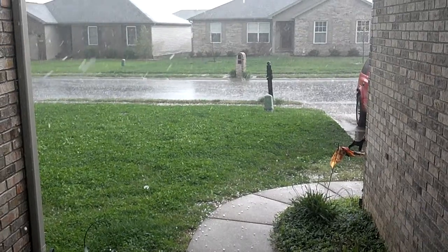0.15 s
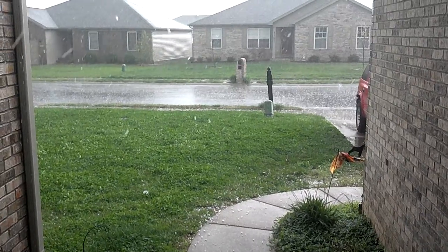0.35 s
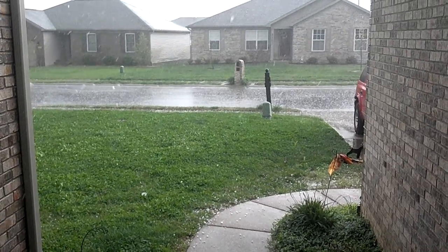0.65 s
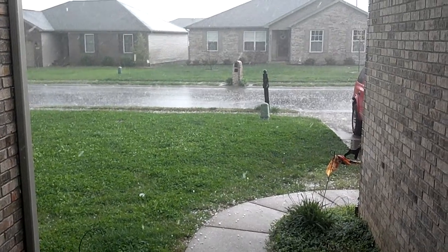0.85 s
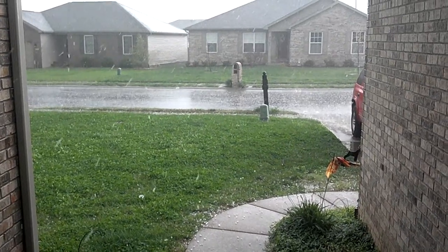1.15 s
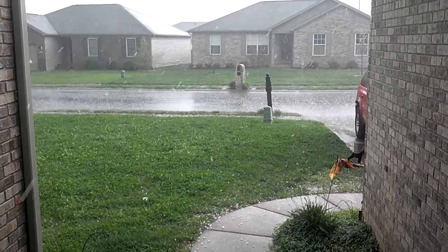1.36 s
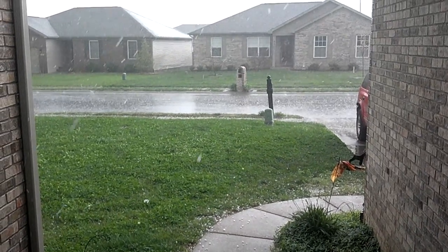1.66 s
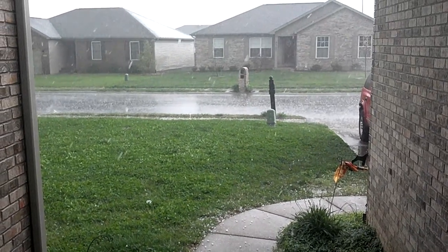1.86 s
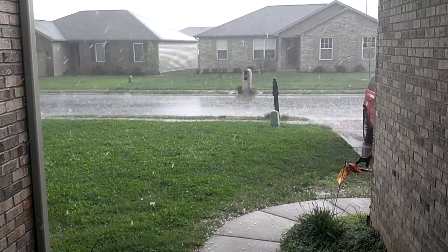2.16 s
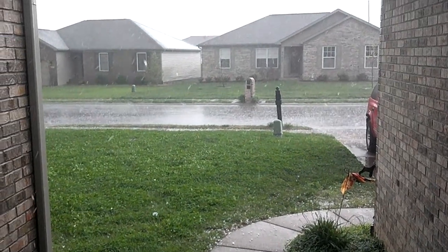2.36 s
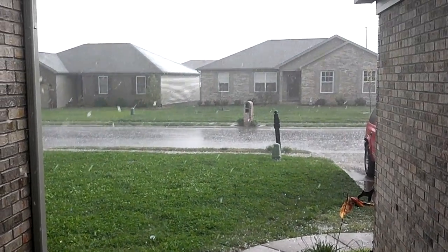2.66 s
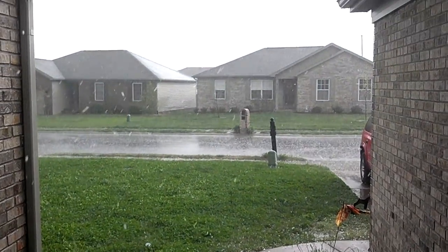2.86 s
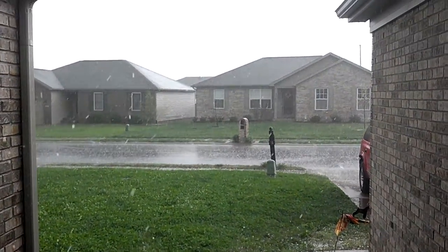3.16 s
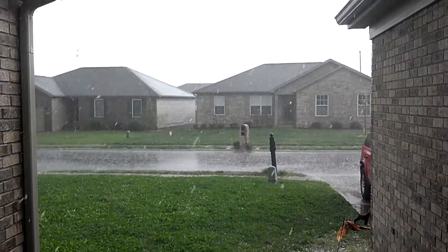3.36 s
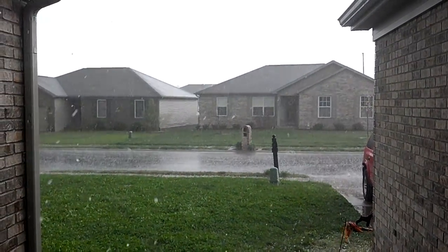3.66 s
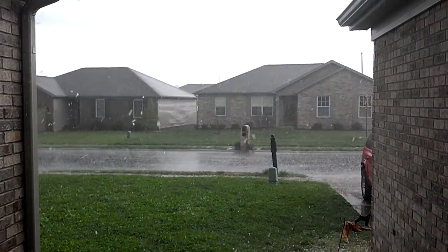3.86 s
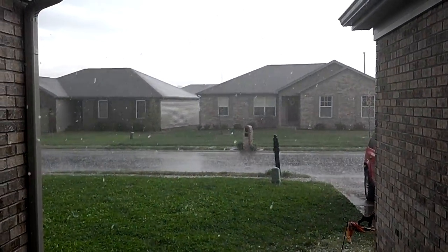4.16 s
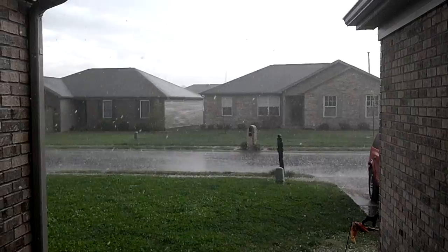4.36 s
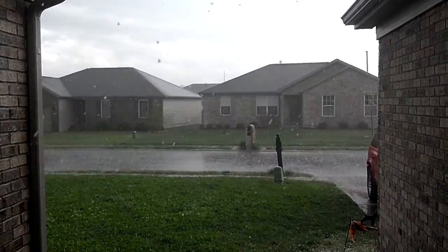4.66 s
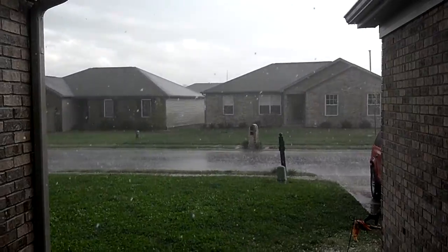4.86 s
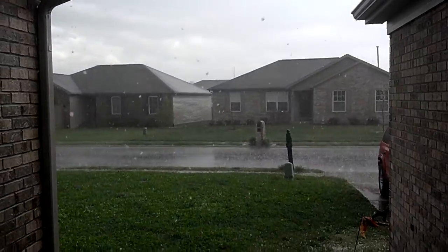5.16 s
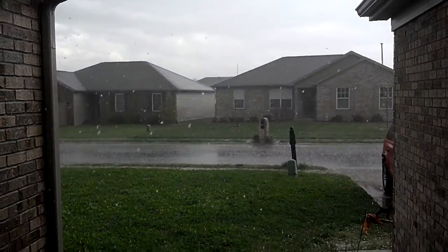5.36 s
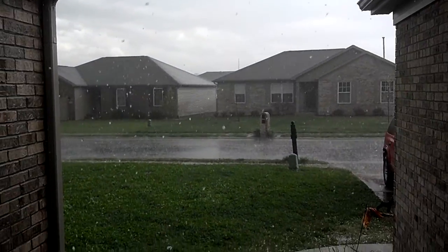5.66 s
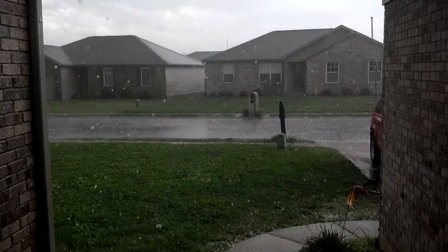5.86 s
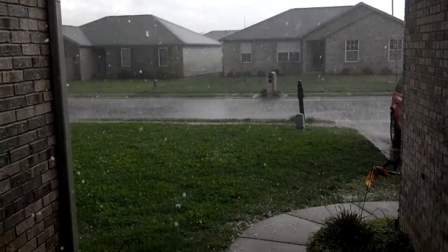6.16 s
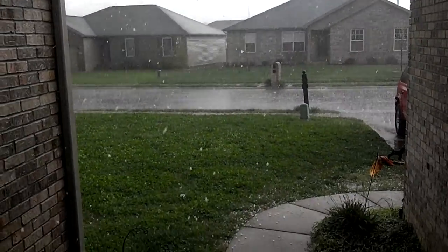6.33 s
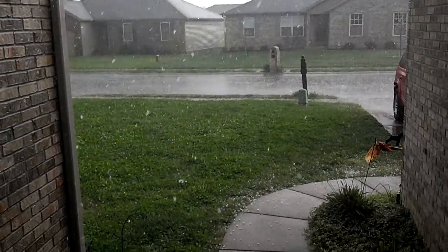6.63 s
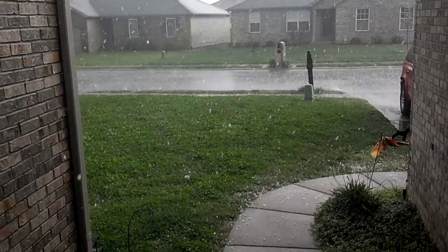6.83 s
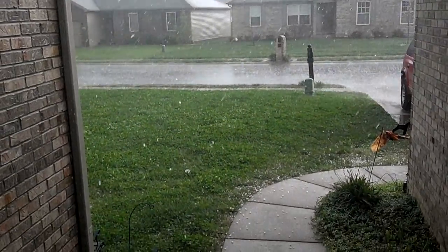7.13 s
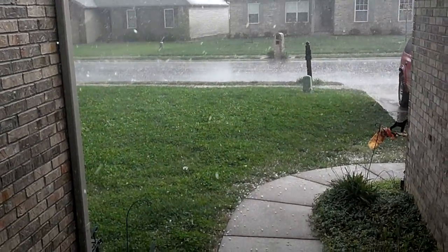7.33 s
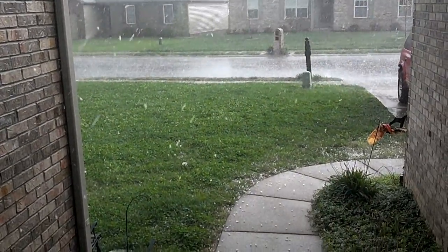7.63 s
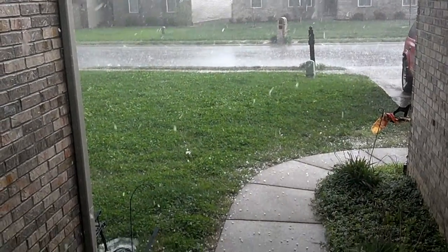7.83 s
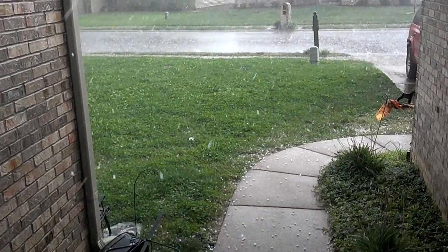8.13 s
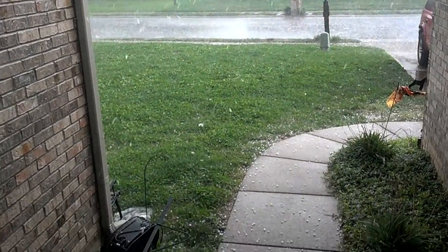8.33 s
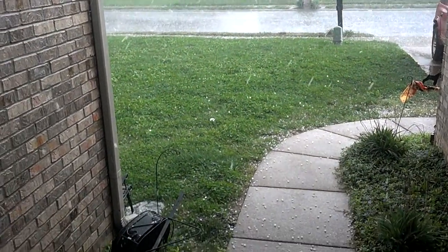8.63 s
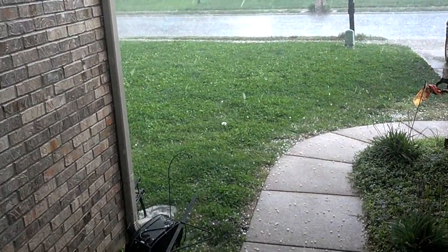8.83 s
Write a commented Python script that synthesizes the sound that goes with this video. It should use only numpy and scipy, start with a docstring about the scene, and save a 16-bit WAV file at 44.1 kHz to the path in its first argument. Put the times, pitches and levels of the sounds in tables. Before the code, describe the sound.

A dense, gritty hiss of heavy rain and hail falls on grass, pavement and roofs, heard from a brick porch. Small hail patters inside it, and close hailstones strike constantly at irregular moments, some sharp ticks and pings, some dull knocks, each rattling briefly between the walls. The downpour starts lower, swells unevenly and is strongest at the end. Wide stereo from a handheld camera, with the very top cut.

```python
"""A gritty hiss of heavy rain and hail on lawn, concrete and roofs, heard from a brick porch: flickering noise bands.
Small hail patters in it; near stones knock, ping and rattle on between the walls as decaying noise echoes.
Hiss and patter sink after many of the near stones and creep back.
A camera with two microphone ports hears it, widens the stereo by cross-feeding the ports and cuts the top."""
import sys
import numpy as np
from scipy import signal
from scipy.fft import rfft, irfft
from scipy.io import wavfile
from scipy.ndimage import uniform_filter1d

SR = 44100
rng = np.random.default_rng(int(sys.argv[2]) if len(sys.argv) > 2 else 0)


def output_pcm(signal):
    """Save a mono or channel-first signal as 16-bit PCM at the path in sys.argv[1].

    Samples are clipped to [-1, 1] before scaling.
    """
    pcm = np.clip(np.atleast_2d(signal).T, -1, 1) * 32767
    wavfile.write(sys.argv[1], SR, np.round(pcm).astype(np.int16))


N = 396459

# slow swell of the downpour: start_s, level_db, treble_db
DOWNPOUR_SWELL = [(0, -34, 1.5), (.3, -32, -4.5), (.45, -28, 0), (1.5, -29, -3), (2.5, -29, -3),
                  (3.4, -25, -2), (4.3, -27.5, -3), (5, -26, -2), (5.6, -23.5, -3), (6.2, -25, -3.5),
                  (7, -25.5, -1.5), (7.8, -26.5, -2.5), (8.5, -21, -2), (8.99, -20, -3.5)]
# near hailstones: start_s, peak_db (before the ports), pitch_hz,
# then against the rattle: ping_db, thud_db, crack_db, splash_db;
# rise_ms (time constant), ring_t60_s, dip_db (of the hiss afterwards; values above 0 do nothing)
NEAR_STONES = [(.111,-24.5,2280,0,-16,1.5,-7,2,0.32,0),(.17,-21.5,1420,-5,-1.5,2.5,-9,2.2,0.36,-2.5),(.348,-17,2230,10,1,-8,-15,2,0.15,-.5),
               (.376,-21,2200,-8,-20,2,0,1,.1,0),(.398,-19,1400,-3,3,-2,-6,1.1,0.22,0),(.501,-16,890,6,9,7.5,-9,1.1,0.15,-1.5),
               (.711,-17,835,4,-20,5,5,2.6,0.21,3.5),(.874,-9,1585,-12,-8.5,-2.5,-8,1.7,0.13,-7),
               (.933,-10.5,2270,2,3,12,15,1.07,0.17,-11),(1.028,-21,2120,-5,-6,-12,-17,2,0.13,-3),
               (1.197,-22,720,-4,3,15,-9,0.92,0.15,0),(1.243,-10,2380,-2,-4.5,5.5,5,1.3,0.24,-7),(1.512,-6.5,2290,10.5,-29,0.5,-13,1.2,0.11,-3.5),
               (1.601,-18,2190,-3,0,9.5,-7,1.3,0.16,-1.5),(1.713,-15,1300,-10,-8,-7,-18,2.9,0.15,0),(1.753,-24,1400,-8,1,12,1,0.88,0.064,0),
               (1.807,-20,2160,-2.5,-18,-7,-8,1.06,.14,-2),(1.818,-23,1300,-1,-2,-3,-14,1,0.11,0),(1.856,-25,1710,-4,-32,-3,-10,4.1,.25,-1.5),(1.965,-14,1890,4,7,14,15,.8,0.2,-9.5),
               (2.281,-25,2200,-8,-17,11,-10,1.4,0.087,0),(2.315,-11.5,2210,-4,-4,5,0,1.8,0.14,0),(2.367,-21.5,865,1,-12,-8,-9,2,0.13,-3),
               (2.409,-25,2260,4,-6.5,11,-6,1.8,0.11,0),(2.508,-16,1700,-3,-18,4.5,-4,2,0.16,-1),(2.514,-11.5,1740,-4.5,1,-7,-9.5,2.4,0.17,-0.5),
               (2.631,-14,1430,-5,-6,-2.5,-7,1.8,0.19,1),(2.654,-21.5,1070,3,-8,-3,-13,1.8,0.1,0),(2.696,-22,2200,-8,-15,9,11,1.1,0.13,0),
               (2.717,-11.5,1140,-1,-5,6,4,5.2,0.15,-2.5),(2.815,-21,2000,-8,-13,7,-2,1,0.21,-1.5),
               (2.915,-14,2060,4,5,10,-8,2.5,0.13,3),(2.96,-14.5,2110,-1,-6,-2,-15,5,0.18,3),(3.051,-20,1870,-6,-9,-6,-14,3,0.12,-1),
               (3.097,-21,1370,0,-3,-19,-23,2,0.16,-1),(3.145,-22,1880,-10,1.5,5,-12,5.8,0.3,0),(3.225,-15.5,1830,-5,-3,-2,-9,5,0.14,0),
               (3.274,-17,2020,-1,0,2,-2,3,0.16,0),(3.316,-10.5,1750,-6,-2,-1,-8,2.8,0.095,-2.5),(3.416,-21,2010,-9,-5,-13,-9,2,0.17,-2),
               (3.52,-10,2400,1.5,-12,3.5,-0.5,3.5,0.16,-8.5),(3.557,-16.5,2170,7,-5,4,-25,1.6,.18,-1),(3.673,-9,2150,-9,-3,4.5,-8,1.1,0.16,-5.5),
               (3.831,-11.5,2200,-7,-10,1,-6,2.2,0.16,-1),(3.909,-11,2130,-23,-8,-8,-13,2.6,0.14,-2.5),(4.037,-9,943,2,-1,-0.5,-11,1.7,0.15,2),
               (4.047,-11.5,2100,3,-10,3,-1,1.8,0.11,1.5),(4.102,-11.5,2150,0,-6,0,-4,2.7,0.11,0),(4.165,-19.5,1800,-5,-4.5,-16,-16,3.8,0.16,-4),
               (4.36,-15,1250,-13,-4.5,-7,-5.5,5.3,0.12,0),(4.513,-12,945,-12,3.5,-2,-7,1.7,0.24,0),(4.585,-17.5,1160,-12,-2,-2.5,-4,4.8,0.22,1.5),
               (4.651,-23,1830,0,-3,5,14,3,0.17,-3),(4.81,-19,1420,1,-7,6.5,-14,1.6,0.08,-0.5),(4.895,-18.5,900,-5,8,3,0,2.7,0.09,0),
               (4.937,-25,780,19,-14,-7,-10,3,0.14,-0.5),(5.025,-20,860,-14,14,12,-11,2,.18,-1),(5.05,-13.5,840,-13,19.5,13.5,-12,2.3,0.1,-1.5),
               (5.074,-15.5,2100,-8.5,-14,5,-8,2.4,0.16,-3),(5.184,-20.5,2000,-8,5,10,9,4.6,0.2,0),(5.235,-18,576,-1,-14,-18,-13,3,0.15,-0.5),
               (5.307,-19,2300,-11,-16,9,-6.5,1,0.24,-1.5),(5.35,-19,2270,1,-20,-3,-5,2,0.13,-1),(5.468,-19,2300,-11,-19,-4,-14,2,0.24,2),
               (5.518,-16,1040,-10,10,6.5,3,6.9,0.37,0),(5.624,-12,2190,-6,-29,11,15,1.7,0.18,-15),(5.643,-14.5,2180,4,-27,3,-31,1,0.12,-1.5),
               (5.712,-27,950,0,-6,-10,-14,0.91,0.086,0),(5.772,-21,1960,-11,-2.5,-4,-7,3,.18,-1.5),(6.067,-14.5,2100,-2,-14,3,-10,1,0.12,3),(6.087,-12,1470,8,-16,11,18,1.7,0.1,2),
               (6.11,-14,1750,2,3.5,6,-4,1.8,0.11,3),(6.144,-19,2300,-2,-7,9,-8,1.8,0.1,0),(6.191,-17,2000,-6,-3,-6,-17,4,0.24,3.5),
               (6.233,-14,2250,-8,3,18,25,1,0.11,-5),(6.238,-4.5,2190,8.5,-16,-6,-14,2,0.16,-14),(6.406,-27,2000,-8,-10,4,-1,0.92,0.092,-4),
               (6.519,-16.5,1290,-10,-4,-4,-14,2.4,0.24,0),(6.563,-18,1900,-4,-2.5,1,-1.5,1.8,.18,-3),(6.85,-15,2040,-1.5,-6,-3,-13,1.2,0.13,2.5),
               (7.05,-17,1400,-5,-2,-5,-9,3.8,.18,-5),(7.072,-15,2160,-2,-10,20,5,1,0.08,4),(7.078,-9,2110,10,-9.5,-10,-17,2,0.2,-11),(7.421,-18,746,-11,-1,-2,-4,2.7,0.3,-5.5),
               (7.648,-17,1120,-6,0,-1.5,-10,0.95,0.32,-1.5),(7.675,-17,1420,-13,-3.5,-2,-10,1.8,0.27,3),(7.751,-19,2240,-8,-8,12,0,0.6,0.065,9),
               (7.886,-17.5,744,3,-13,-16,-5,2,0.17,-2),(7.961,-20,2400,-12,-30,10,-5,.6,0.065,0),
               (8.036,-17,2400,2,1,15,-4.5,1,0.07,0.5),(8.146,-14,2120,-15,2,2,-3,6.1,0.15,-2),(8.311,-15,1910,-5,1.5,1.5,-6,2.7,.15,-1),
               (8.467,-18,1510,-5,-4,-10,-5,3,0.13,1),(8.493,-15.5,1100,-10,-4,-1,-12,4,0.13,4),(8.539,-10.5,990,-6,7.5,-8,-3.5,0.92,0.16,-4.5),(8.576,-15.5,935,-3,18,-7,-15,3.7,0.078,-7),
               (8.63,-11,2190,-9,-22,16.5,14,.4,0.05,-15),(8.636,-16,2000,0,-10,6,8,1,.19,0),(8.83,-21,1100,-1,8,-3,-7,3.2,0.097,1),(8.914,-15.5,1480,0,-8,2,-3,2.5,0.11,-0.5),
               (8.956,-17.5,2060,2,-9,-7,-19,2.2,.18,0)]
# colour of the downpour through the microphone: frequency_hz, density_db (per Hz)
DOWNPOUR_COLOUR = [(30, -5), (60, -30.5), (130, -5.5), (300, -7), (360, -5), (540, -11.5), (850, -7.5),
                   (1500, -11.5), (2100, -7), (2700, -13.5), (3200, -14.5), (3800, -16), (5400, -17.5),
                   (7500, -22), (9000, -27), (10400, -28), (13100, -22.5), (15500, -20.5)]
# colour difference of the ports: frequency_hz, left_minus_right_db
PORT_TILT_DB = [(50, -.4), (130, -1.1), (260, -2.2), (400, -3.5), (650, 0), (950, -2.5), (1750, -1.5),
                (2300, -5), (3200, -.5), (5000, 5.5), (7500, 2), (9000, .3), (11500, -3.5), (14500, -7)]
# colour of what differs between the ports: frequency_hz, gain_db
APART_COLOUR = [(380, -1), (510, 4), (750, -2), (950, 0)]

PORT_GAP_M, SOUND_M_PER_S = .14, 343
CROSS_LAG_SAMPLES, TOP_HZ = 16, 15740
HIT_SAMPLES = 8192
ECHOES_PER_S, ECHO_CLUMP_S = 350, 0.00052  # single wall echoes stand out of the rattle
TICK_DB, TICK_S = 5.5, 0.00086  # tick of ice opening the blow, for rises up to 1 ms
SPLASH_EXTRA_T60_S = 0.35  # on top of the stone's own decay
PING_PEAK_S = 0.0015
SINK_S, REBOUND_S, CREEP_S = 0.057, 0.057, 0.53  # time constants
REBOUND_SHARE = 0.35  # of a dip; the rest creeps back
TREBLE_SPARED = 0.087  # share of a dip


def undb(db):
    """Amplitude ratio of a level in dB."""
    return 10 ** (np.asarray(db) / 20)


def unit(gain):
    """Response scaled to RMS 1."""
    return gain / np.sqrt(np.mean(np.abs(gain) ** 2))


def table_db(table, hz):
    """Table level in dB, interpolated over log frequency."""
    table_hz, level_db = np.transpose(table)
    return np.interp(np.log(hz + 1), np.log(table_hz), level_db)


def colour(hz):
    """Gain of the downpour's spectrum."""
    return undb(table_db(DOWNPOUR_COLOUR, hz))


def walk(rate_hz):
    """Random levels, held for 1 / rate_hz and slewed twice; spread near 1."""
    hold = int(SR / rate_hz)
    held = np.repeat(rng.standard_normal(N // hold + 1), hold)
    slewed = uniform_filter1d(uniform_filter1d(held, hold), hold)
    return 1.3 * slewed[:N]


def ring(hz, centre_hz, q):
    """Response of one resonance, gain 1 at the centre."""
    return 1 / (1 + 1j * q * (hz / centre_hz - centre_hz / hz))


def rain(treble_db):
    """Countless drops: octave-spaced noise bands that flicker, roughened by nearer single drops."""
    hz = np.arange(N // 2 + 1) * SR / N + 1
    flutter_db = 1.0 * walk(18)  # common to all bands
    landed = rng.random(N) < 300 / SR  # drops per s
    drops = landed * undb(3.2 * np.minimum(rng.exponential(size=N), 4))
    drop_power = drops ** 2
    out = 0
    for centre_hz in 60.0 * 2. ** np.arange(9):
        band = np.clip(1 - np.abs(np.log2(hz / centre_hz)), 0, 1) ** .5
        # a drop lasts 1.5 cycles plus a 0.7 ms tail
        keep = np.exp(-1 / (1.5 * SR / centre_hz + .0007 * SR))
        smeared = signal.lfilter([1 - keep], [1, -keep], drop_power)
        grit = np.sqrt(1 + .6 * smeared / np.mean(drop_power))
        rough = grit * rng.standard_normal((2, N))
        noise = irfft(rfft(rough) * band * colour(hz), N)
        treble_share = np.clip(np.log2(centre_hz / 1000) / 3, 0, 1)  # full from 8 kHz
        flicker_db = flutter_db + 1.91 * walk(22)
        out = out + noise * undb(flicker_db + treble_share * treble_db)
    return out / out.std()


def patter(count=330):
    """Smaller, farther hail at random moments: short knocks, most of them faint."""
    c = rng.random((count, 8)).T
    return knocks(
        start_s=c[0] * N / SR, peak_db=5 + 6.6 * c[1] ** 2, pitch_hz=500 * 5.67 ** c[2],
        ping_db=-6 + 11 * c[3], thud_db=-14 + 11 * c[4], crack_db=-11 + 13 * c[5],
        splash_db=-17 + 13 * c[6], rise_ms=0.32 + 5.7 * c[7], ring_t60_s=np.full(count, .09),
        q=1.1, clump_db=4.5)


def knocks(start_s, peak_db, pitch_hz, ping_db, thud_db, crack_db, splash_db, rise_ms, ring_t60_s,
           q, clump_db):
    """Each stone pings at its pitch and excites wall echoes: resonant noise with thud, crack and splash."""
    t = np.arange(HIT_SAMPLES) / SR
    hz = np.arange(HIT_SAMPLES // 2 + 1) * SR / HIT_SAMPLES + 1
    thud_part = unit(ring(hz, 640, 0.72) ** 2 * colour(hz))
    crack_part = unit(ring(hz, 4390, 0.64) ** 2 * colour(hz))
    splash_part = unit(ring(hz, 10630, 0.62) ** 2 * colour(hz))
    clump_keep = np.exp(-1 / (ECHO_CLUMP_S * SR))
    ping_age = t / PING_PEAK_S
    ping_swell = ping_age * np.exp(1 - ping_age)
    out = np.zeros((2, N + HIT_SAMPLES))
    stones = zip(start_s, peak_db, pitch_hz, ping_db, thud_db, crack_db, splash_db, rise_ms, ring_t60_s)
    for at_s, level, pitch, ping_level, thud_level, crack_level, splash_level, rise, t60 in stones:
        chance = rng.standard_normal((3, HIT_SAMPLES))
        single = (rng.random(HIT_SAMPLES) < ECHOES_PER_S / SR) * chance[0] ** 2
        clump_power = undb(2 * clump_db) * signal.lfilter([1], [1, -clump_keep], single)
        echoes = chance[1:] * np.sqrt(1 + clump_power) * undb(-60 * t / t60)
        build = 1 - np.exp(-1000 * t / rise)
        # a softer blow has a weaker tick
        tick = undb(TICK_DB) * np.exp(-t / TICK_S) / max(rise, 1)

        # a peak on a broad skirt
        knock = unit(ring(hz, pitch, q) ** 2 + undb(-26.0) * ring(hz, pitch, 1.0) ** 2)
        thud = rfft(echoes * build) * undb(thud_level) * thud_part
        body = rfft(echoes * (build + tick / 2)) * (knock + undb(crack_level) * crack_part)
        splash_echoes = echoes * (build + tick) * undb(-60 * t / SPLASH_EXTRA_T60_S)
        splash = rfft(splash_echoes) * undb(splash_level) * splash_part
        rattle = irfft(thud + body + splash, HIT_SAMPLES)

        turns = pitch * t + chance[1, 0]  # random phase
        ping = undb(ping_level) * 2 * ping_swell * np.sin(2 * np.pi * turns)
        hit = rattle + ping
        i = int(at_s * SR)
        out[:, i:i + HIT_SAMPLES] += hit * undb(level) / np.abs(hit).max()
    return out[:, :N]


def dips(t, start_s, dip_db):
    """Level change in dB: sinks after stones with a negative dip, returns in two exponential stages."""
    out = np.zeros(len(t))
    for at_s, db in zip(start_s, dip_db):
        age = np.maximum(t - at_s, 0)
        rebound = REBOUND_SHARE * np.exp(-age / REBOUND_S)
        creep = (1 - REBOUND_SHARE) * np.exp(-age / CREEP_S)
        out = out + min(db, 0) * (1 - np.exp(-age / SINK_S)) * (rebound + creep)
    return out


def ports(pair):
    """Diffuse sound: alike at both ports in the bass, unrelated in the treble; each port has its colour."""
    hz = np.arange(N // 2 + 1) * SR / N
    alike = np.sinc(2 * hz * PORT_GAP_M / SOUND_M_PER_S)
    both, apart = rfft(pair) * np.sqrt(np.array([1 + alike, 1 - alike]) / 2)
    apart = apart * undb(table_db(APART_COLOUR, hz))
    left_power = 1 / (1 + undb(-2 * table_db(PORT_TILT_DB, hz)))  # share of the total
    port_gain = np.sqrt(2 * np.array([left_power, 1 - left_power]))
    return irfft(np.array([both + apart, both - apart]) * port_gain, N)


def scene():
    """Rain and patter under the swell and dips, plus near stones, at the two ports."""
    t = np.arange(N) / SR
    swell_s, *columns = np.transpose(DOWNPOUR_SWELL)
    level_db, treble_db = (np.interp(t, swell_s, c) for c in columns)
    *blows, dip_db = np.transpose(NEAR_STONES)
    coarse_s = np.arange(0, N / SR, .002)
    sunk_db = np.interp(t, coarse_s, dips(coarse_s, blows[0], dip_db))
    level_db = level_db + sunk_db
    treble_db = treble_db - TREBLE_SPARED * sunk_db
    downpour = undb(level_db) * (rain(treble_db) + undb(-4.0) * patter())
    stones = knocks(*blows, q=1.28, clump_db=3.0)
    return ports(downpour + stones)


def record(dry):
    """Camera: each channel loses the other port's sound, a moment late; a steep low-pass cuts the top."""
    late = np.pad(dry[::-1], ((0, 0), (CROSS_LAG_SAMPLES, 0)))[:, :N]
    steep = signal.ellip(14, .2, 90, TOP_HZ, fs=SR, output="sos")  # ripple and stopband in dB
    return signal.sosfilt(steep, dry - late)


dry = scene()
out = record(dry)
output_pcm(out)
```